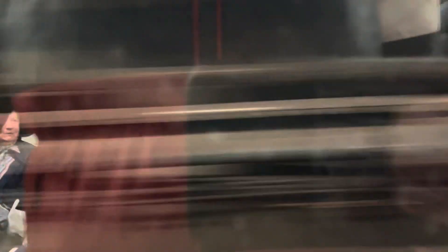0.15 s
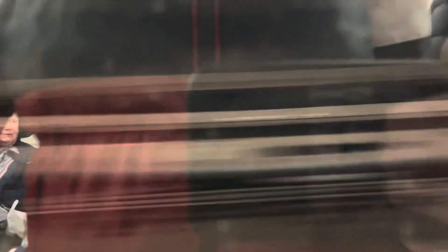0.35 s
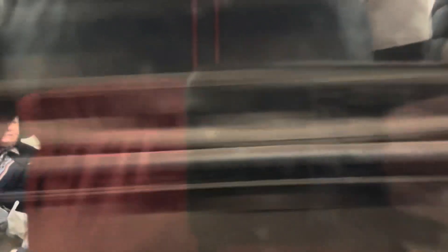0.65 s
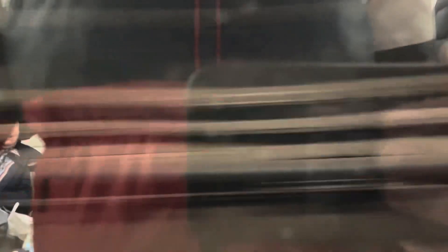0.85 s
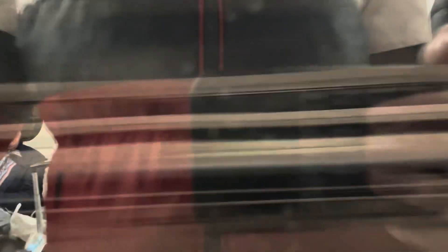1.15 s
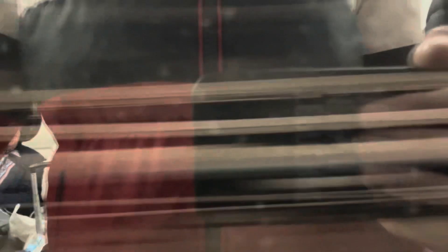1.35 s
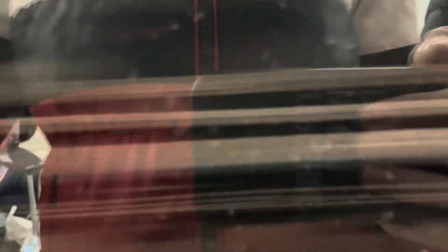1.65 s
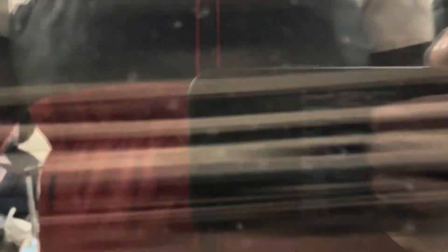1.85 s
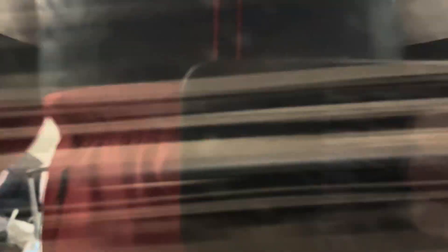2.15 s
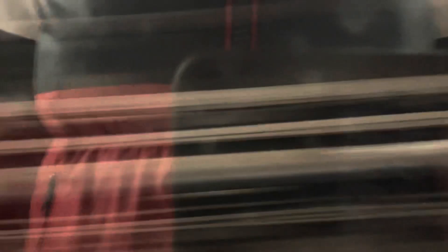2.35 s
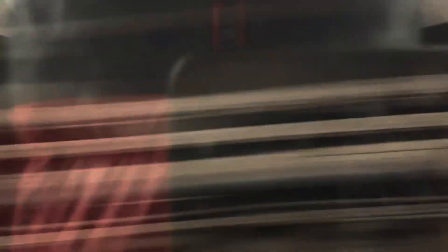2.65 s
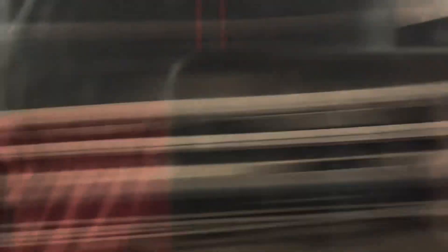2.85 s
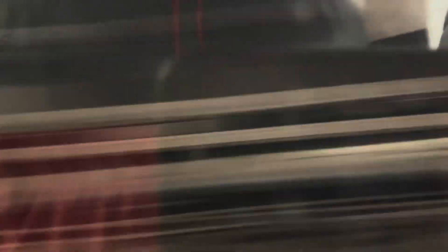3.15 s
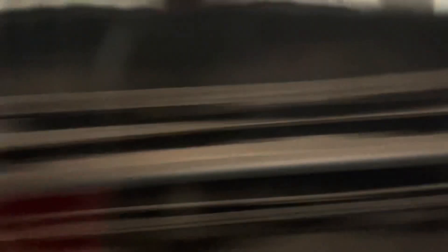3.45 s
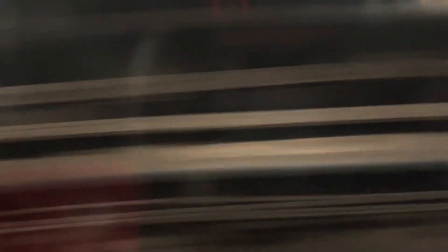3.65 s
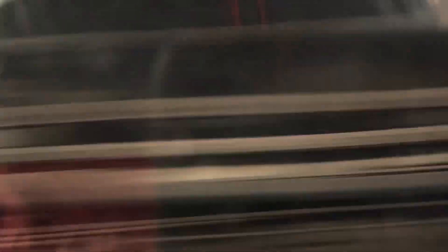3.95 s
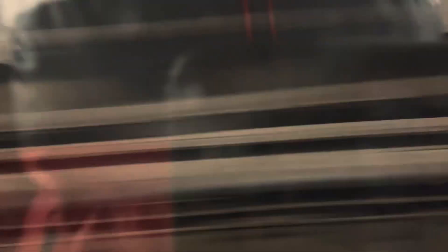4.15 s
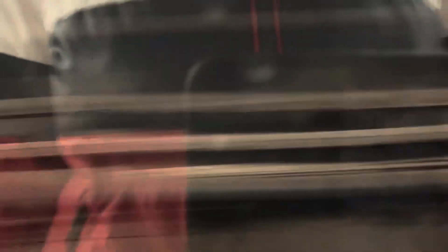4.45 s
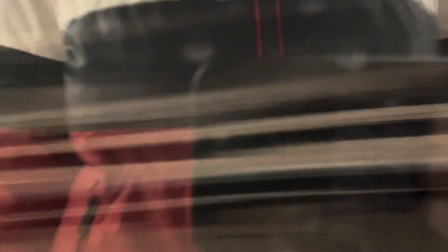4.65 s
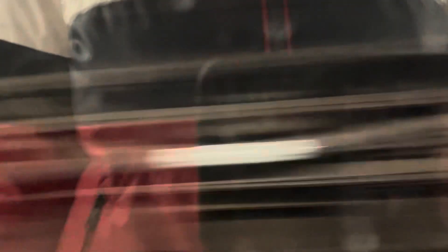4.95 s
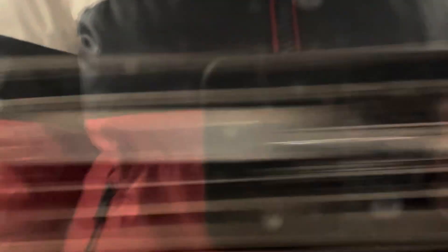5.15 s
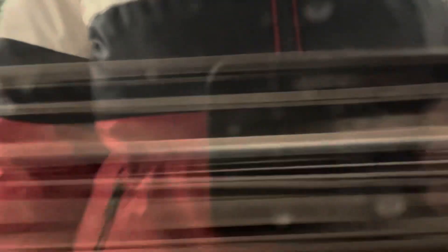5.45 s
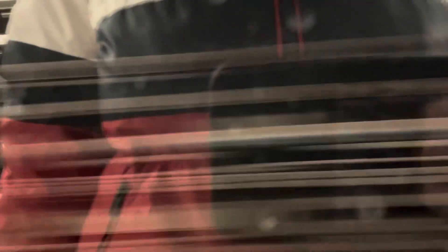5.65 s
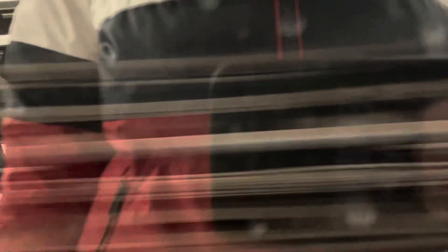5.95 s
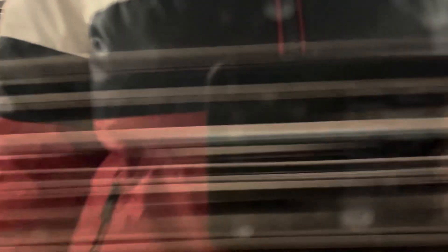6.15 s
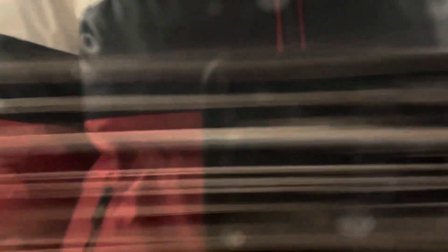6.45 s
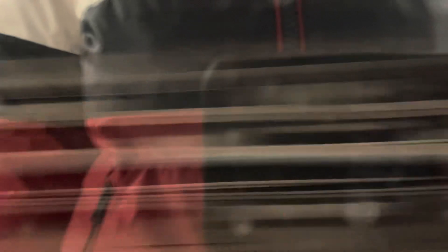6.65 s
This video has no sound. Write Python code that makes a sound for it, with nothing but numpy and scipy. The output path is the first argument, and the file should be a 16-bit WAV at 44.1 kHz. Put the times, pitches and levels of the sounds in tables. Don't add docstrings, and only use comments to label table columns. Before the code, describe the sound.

A subway train runs at steady speed, heard from the passenger side of the window on a phone. Continuous low rumble and rail roar dominate, with an unsteady nasal hum and weak overtones beating irregularly. Thin plastic squeaks and a brief scrape occur in the first second or so; sparse rattles follow, with the heaviest knocks past four and six seconds. Treble is weak, the cabin close and boomy.

```python
import sys
import numpy as np
from scipy import signal
from scipy.fft import rfft, irfft, dct, next_fast_len
from scipy.io import wavfile
from scipy.ndimage import uniform_filter1d

SR = 44100
rng = np.random.default_rng(int(sys.argv[2]) if len(sys.argv) > 2 else 0)


def transcribe(signal):
    frames = np.atleast_2d(signal).T
    limited = np.clip(frames, -1, 1)
    pcm = np.round(limited * 32767).astype(np.int16)
    wavfile.write(sys.argv[1], SR, pcm)


def gain_from_db(level_db):
    decades = np.asarray(level_db, float) / 20
    return 10 ** decades


N = 300757
SPAN = next_fast_len(N)
HZ = np.fft.rfftfreq(SPAN, 1 / SR) + 1e-3
TIME = np.arange(N) / SR


def along(table):
    hz, value = np.transpose(table)
    return np.interp(np.log(HZ), np.log(hz + 1), value)


def curves(table):
    s, *columns = np.transpose(table)
    return [np.interp(TIME, s, column) for column in columns]


def beats(table, width_s):
    return sum(db * np.exp(-((TIME - s) / width_s) ** 2) for s, db in table)


def unit(x):
    return x / np.sqrt(np.mean(np.mean(x, axis=0) ** 2))


def noise():
    return rfft(rng.standard_normal((2, SPAN)))


def peak(hz, width_hz):
    return 1 / np.sqrt(1 + (2 * (HZ - hz) / width_hz) ** 2)


def walk(rate):
    k = int(SR / rate)
    held = np.repeat(rng.standard_normal(N // k + 1), k)
    return 1.1 * uniform_filter1d(uniform_filter1d(held, k), k)[:N]


# frequency in Hz, lead of the left in radians.
PORT_LEAD = [(0, 0), (520, -0.2), (780, 1.6), (1120, 1.7), (2840, 8.0), (3270, 8.1), (4220, 6.0),
             (5080, 7.7), (5680, 4.5), (6460, 6.0), (7580, 3.3), (9560, 2.9), (12500, 0.2), (13000, -0.1)]
# frequency in Hz, likeness from 0 to 1.
PORT_LIKENESS = [(60, 1), (230, 0.89), (310, 0.48), (400, 0.81), (460, 0.7), (700, 0.12), (1000, .42),
                 (1500, 0.41), (2200, 0.35), (2900, 0.95), (3600, 0.23), (4700, 0.11), (5400, 0.44),
                 (6500, 0.3), (7200, 0.49), (7700, 0.58), (8600, 0.88), (9200, 0.75), (10300, 0.28),
                 (12600, 0.57)]
# frequency in Hz, left minus right in dB.
PORT_TILT = [(60, 1.0), (110, 1.5), (200, 2), (360, 1), (650, 2.5), (1180, 2), (2150, -2), (3900, 2),
             (7080, 1.2), (12900, 0.5)]


def ports(pair):
    like = np.clip(along(PORT_LIKENESS), 0, 1)
    late = np.exp(-1j * along(PORT_LEAD)) * pair[0]
    right = like * late + np.sqrt(1 - like ** 2) * pair[1]
    tilt = gain_from_db(along(PORT_TILT) / 2)
    return irfft(np.array([pair[0] * tilt, right / tilt]), SPAN)[:, :N]


# time in seconds, rail roughness in dB, wheel singing in dB, ripple depth in dB.
TRACK_STATE = [(0.0, 1.5, 1, 1.5), (.5, 0, -3, -1), (1.0, 1.5, 0, 3), (1.3, 0.5, -3, -2),
               (1.7, -2.5, -1.5, 1.5), (2.2, 1.5, -3, -0.9), (2.8, -3, 0, -0.5), (3.3, 1, -1, -1.5),
               (3.7, -1, 1, 2), (4.1, 0.5, 1, 0.9), (4.6, -0.5, 0, -2), (5.0, 0, -0.5, -0.5),
               (5.4, 0.5, 0, 1.5), (5.8, 1, 0, 3), (6.2, 2, 0.5, 1.5), (6.5, 1, -1, 4.5),
               (6.82, 1.5, -1, -1.5)]
# frequency in Hz, level in dB per Hz.
ROAR_COLOUR = [(20, -62.5), (45, -49), (110, -49.5), (220, -46.5), (330, -46.5), (520, -50.5),
               (1000, -61.5), (1800, -69), (2700, -74.5), (4000, -79.5), (6500, -84.5), (7500, -87.5),
               (12200, -94), (12900, -100), (14500, -106)]
REGION_HZ = [200, 900, 3200, 9000]
# share of roughness (0-1), share of singing (0-1), own flicker in dB.
REGION_ANSWERS = [
    (0.71, 0.045, 0.5),
    (1, .1, 0.8),
    (.3, 0.42, 0.7),
    (.1, .1, 0.4),
]


def roar():
    field = noise() * gain_from_db(along(ROAR_COLOUR))
    rough_db, sing_db, _ = curves(TRACK_STATE)
    out = 0
    for k, (rough, sing, flicker_db) in enumerate(REGION_ANSWERS):
        share = np.interp(np.log(HZ), np.log(REGION_HZ), np.eye(len(REGION_HZ))[k])
        swell_db = rough * rough_db + sing * sing_db + flicker_db * walk(16)
        out = out + ports(field * share) * gain_from_db(swell_db)
    return unit(out) * gain_from_db(-21.5)


def steady(x, share):
    size = uniform_filter1d(np.abs(signal.hilbert(x.mean(axis=0), SPAN)[:N]), 500)
    return unit(x / (size + 0.19 * size.mean()) ** np.clip(share, 0, 1))


def drift(x, hz):
    turn = np.cumsum(2 * np.pi * 0.014 * hz * walk(4) / SR)
    return (signal.hilbert(x, SPAN)[:, :N] * np.exp(1j * turn)).real


# frequency in Hz, width in Hz, level in dB.
HOWL_OVERTONES = [(775, 49, -20), (832, 60, -24), (1203, 78, -24), (1339, 88, -27.5), (1584, 150, -28.5),
                  (1996, 60, -29), (2121, 65, -31), (2322, 98, -32), (2461, 130, -36), (3042, 350, -34.5)]
# time in seconds, swell in dB.
IN_STEP = [(0.08, 5.5), (0.339, 6.5), (0.409, 5.5), (0.464, 7), (0.509, 4.5), (0.559, 10), (0.698, 8.5),
           (1.177, 6.5), (1.267, 7.5), (1.477, 10.5), (1.616, 7), (1.676, 4.5), (1.786, 7.5), (1.911, 3.5),
           (2.11, 3.5), (2.16, 9.5), (2.22, 7), (2.365, 4.0), (2.564, 4.5), (2.644, 1.5), (2.774, 4.5),
           (2.844, 10.5), (3.033, 5.5), (3.218, 4.5), (3.243, 7), (3.273, 6.5), (3.322, 6.5), (3.547, 5),
           (3.856, 5), (4.016, 3.5), (4.295, 3.5), (4.445, 7.0), (4.5, 2.5), (4.53, 5.0), (4.595, 6),
           (4.889, 9), (5.059, 7.5), (5.118, 6), (5.198, 4), (5.258, 6), (5.582, 4.0), (5.642, 6.5),
           (5.702, 5), (5.732, 6), (5.857, 8.5), (6.121, 5.5), (6.47, 3), (6.5, 7), (6.6, 5), (6.77, 6)]
# time in seconds, dip in dB.
OUT_OF_STEP = [(0.21, -6), (0.254, -2.5), (0.439, -4.5), (0.599, -8), (0.773, -10), (0.798, -15),
               (0.823, -14), (0.888, -6), (0.948, -4), (0.988, -3), (1.107, -6), (1.227, -3.0),
               (1.297, -14), (1.347, -3), (1.512, -9), (1.591, -5.5), (1.64, -12), (1.726, -8), (1.751, -5),
               (1.861, -4.0), (1.961, -14), (2.017, -7.0), (2.065, -2.5), (2.195, -8), (2.25, -5),
               (2.33, -12), (2.689, -10), (2.804, -3.5), (2.898, -1), (2.948, -4), (3.098, -12),
               (3.133, -1.5), (3.173, -2.5), (3.457, -6), (3.512, -14), (3.577, -9), (3.614, -9),
               (3.662, -6), (3.926, -3.5), (4.096, -3.5), (4.37, -12), (4.41, -10), (4.639, -6),
               (4.729, -4), (4.759, -6), (4.859, -8), (5.02, -11), (5.228, -12), (5.278, -4.0), (5.303, -7),
               (5.468, -14), (5.557, -8), (5.797, -7), (5.941, -13), (6.161, -7), (6.301, -5.5), (6.53, -6),
               (6.575, -12), (6.63, -11), (6.82, -3.0)]


def howl():
    howl_hz, width_hz, beat_s = 401, 26, 0.013
    _, sing_db, ripple_db = curves(TRACK_STATE)
    resonance = peak(howl_hz, width_hz) ** 1.28 + 0.4 * peak(howl_hz, 5.5) ** 2
    tone = steady(ports(noise() * resonance), 0.67)
    upper = 0
    for hz, overtone_width_hz, db in HOWL_OVERTONES:
        follow_db = 1.8 * sing_db if hz > 1800 else 0.24 * ripple_db
        band = unit(ports(noise() * peak(hz, overtone_width_hz) ** 2))
        upper = upper + gain_from_db(db + 1.9 * walk(8.6) + follow_db) * drift(band, hz)
    beat_db = beats([*IN_STEP, *OUT_OF_STEP], beat_s)
    return tone * gain_from_db(-19.5 + ripple_db + beat_db) + upper * gain_from_db(-19.5)


# time in seconds, change in dB.
FLOOR_JOLTS = [(0.08, 10), (0.13, -4), (0.2, 6.5), (0.424, -8), (0.529, -7.5), (0.858, -14), (1.058, -4),
               (1.142, 3), (1.322, -8), (1.497, 0), (1.761, -10), (1.956, -10), (2.37, -13), (2.524, -4.5),
               (2.599, 5), (2.839, -4), (3.003, -2), (3.158, -2), (3.347, 1), (3.527, 6), (3.597, -4),
               (3.751, -5), (3.811, -1), (3.886, -6), (4.011, -1), (4.116, -5), (4.275, -1.5), (4.435, -14),
               (4.505, -5), (4.58, 4.5), (4.689, 3), (4.759, -8), (4.879, -16), (5.039, -2), (5.502, -8),
               (5.602, -16), (5.702, -2), (5.802, -17), (5.877, -7), (6.056, 6), (6.241, -4), (6.336, -15),
               (6.445, -3.0), (6.57, -3), (6.79, -4)]


def thrum():
    tone = steady(ports(noise() * peak(69.8, 18) ** 2), 0.75)
    return tone * gain_from_db(-28 + beats(FLOOR_JOLTS, 0.045))


def rubbing():
    hiss = ports(noise())
    return hiss * gain_from_db(1.7 * walk(70)) / np.std(hiss)


def ring(push, hz, spread_hz):
    edges = hz + spread_hz * np.array([-1, 1])
    return signal.sosfilt(signal.butter(2, edges, "bandpass", fs=SR, output="sos"), push)


# start in seconds, length in seconds, frequency in Hz, level in dB.
FITTING_SQUEAKS = [(0.085, 0.098, 5200, -51.5), (0.057, 0.13, 10600, -57), (0.098, 0.18, 6400, -47.5),
                   (0.355, 0.076, 7760, -52), (.345, 0.077, 10100, -60), (.54, 0.062, 6470, -53),
                   (0.869, .05, 7240, -57), (0.872, .05, 9630, -54), (1.03, 0.15, 7070, -53),
                   (1.027, 0.17, 9500, -53), (1.543, 0.12, 9640, -57), (1.561, .07, 8300, -60.5),
                   (1.562, 0.055, 10800, -64), (1.546, .08, 11600, -63), (1.623, 0.14, 6320, -53),
                   (3.445, .2, 6590, -42), (3.48, .11, 13000, -66), (3.763, .2, 5700, -71),
                   (3.822, 0.19, 6100, -53.5), (5.956, 0.052, 7900, -55), (6.105, .06, 7070, -54),
                   (6.307, .012, 11000, -57), (6.303, .012, 12440, -59)]


def squeaks():
    spread_hz, arc, sag, octave_db = 230, 0.03, 0.79, -29.5
    out, hiss = np.zeros((2, N)), rubbing()
    for s, length, base_hz, base_db in FITTING_SQUEAKS:
        i, n = int(s * SR), int(length * SR)
        phase = np.arange(n) / n
        shape = np.sin(np.pi * phase ** 0.65) ** 1.3
        bend = shape - shape.mean() + sag * (0.5 - phase)
        voices = [(base_hz, base_db, spread_hz * (base_hz / 6600) ** 1.3),
                  (min(2 * base_hz, 0.4 * SR), base_db + octave_db, spread_hz)]
        for hz, db, spread in voices:
            band = ring(hiss[:, i:i + n] * shape, hz, spread)
            turn = np.exp(2j * np.pi * np.cumsum(arc * hz * bend) / SR)
            out[:, i:i + n] += (signal.hilbert(band) * turn).real / np.std(band) * gain_from_db(db)
    return out


# start in seconds, length in seconds, frequency in Hz, level in dB.
PANEL_KNOCKS = [(1.361, .121, 2301, -47), (1.591, .071, 2451, -46.2), (1.33, 0.088, 241, -29.5),
                (1.958, .071, 263, -29.2), (2.717, .311, 3700, -50.5), (3.551, .401, 2051, -45.2),
                (3.901, 0.13, 1941, -45), (3.42, .15, 280, -29.5), (4.406, .071, 336, -19.5),
                (4.422, .201, 201, -31.2), (4.601, 0.59, 2001, -49), (5.301, .078, 205, -30.5),
                (5.44, 0.11, 192, -31.2), (5.62, .091, 1251, -41), (5.97, .061, 1160, -39.2),
                (6.095, .081, 901, -31.5), (6.106, .051, 1401, -41.2), (6.127, .241, 614, -31.5),
                (6.132, .085, 270, -22), (6.251, .081, 332, -26.2), (6.255, .078, 224, -22.5),
                (6.701, 0.074, 2710, -47.5)]
# start in seconds, length in seconds, frequency in Hz, level in dB.
LONG_SCRAPE = [
    (.855, .045, 2900, -43),
    (.86, .12, 3400, -47),
    (.873, .05, 2150, -39.5),
    (.868, .05, 1250, -35),
    (.9, .07, 1800, -43),
    (.953, .028, 3200, -44),
    (.96, .033, 4700, -47),
    (.605, .022, 2000, -41),
]


def knocks():
    out, hiss = np.zeros((2, N)), rubbing()
    for s, length, hz, db in [*PANEL_KNOCKS, *LONG_SCRAPE]:
        i, n = int(s * SR), int(length * SR)
        shape = np.sin(np.pi * (np.arange(n) / n) ** 0.45) ** 0.9
        band = ring(hiss[:, i:i + n] * shape, hz, 0.22 * hz)
        band = band / (uniform_filter1d(np.abs(band), 90) + 0.5 * np.std(band)) * shape
        out[:, i:i + n] += band / np.std(band) * gain_from_db(db)
    return out


def scene():
    return roar() + howl() + thrum() + squeaks() + knocks()


def lapped(x, offset, change):
    half, lead = 1024, 2048 - offset
    window = signal.windows.kaiser_bessel_derived(2 * half, 4 * np.pi)
    pair = np.array([x[0] + x[1], x[0] - x[1]]) / 2
    pair = np.pad(pair, ((0, 0), (lead, 3 * half - (N + lead) % half)), "reflect")
    blocks = pair.reshape(2, -1, half)
    frames = np.concatenate([blocks[:, :-1], blocks[:, 1:]], axis=2) * window
    a, b, c, d = np.split(frames, 4, axis=2)
    folded = np.concatenate([-c[..., ::-1] - d, a - b[..., ::-1]], axis=2)
    lines = dct(folded, type=4, norm="ortho")
    u, v = np.split(dct(change(lines), type=4, norm="ortho"), 2, axis=2)
    out = np.zeros_like(blocks)
    out[:, :-1] += np.concatenate([v, -v[..., ::-1]], axis=2) * window[:half]
    out[:, 1:] += np.concatenate([-u[..., ::-1], -u], axis=2) * window[half:]
    mid, side = out.reshape(2, -1)[:, lead:lead + N]
    return np.array([mid + side, mid - side])


def top_cut(x):
    return signal.sosfilt(signal.butter(12, 14150, fs=SR, output="sos"), x)


def record(dry):
    rounding, boom_top_hz = 1.4, 1500
    dip = gain_from_db(-7.5 * peak(5540, 130) ** 2)
    spectrum = rfft(dry, SPAN) * dip
    boomy = peak(0, 2 * boom_top_hz) ** 4
    boom = irfft(spectrum * boomy, SPAN)[:, :N]
    rest = irfft(spectrum * (1 - boomy), SPAN)[:, :N]
    heard = np.tanh(rounding * boom) / rounding + rest
    return top_cut(heard)


dry = scene()
out = record(dry)
transcribe(out)
```